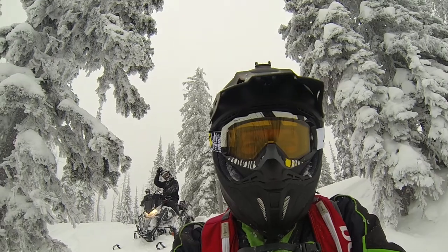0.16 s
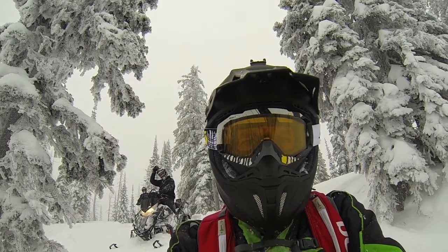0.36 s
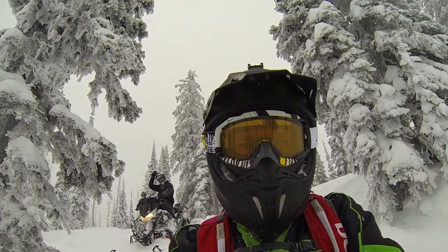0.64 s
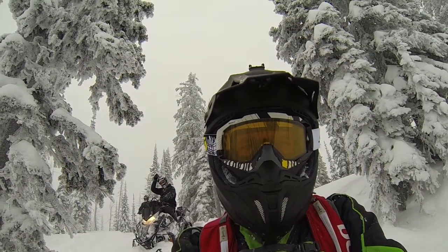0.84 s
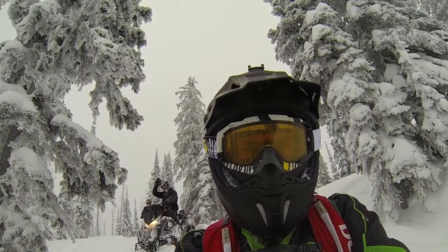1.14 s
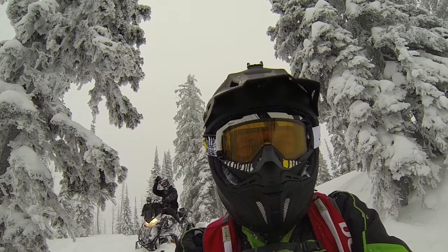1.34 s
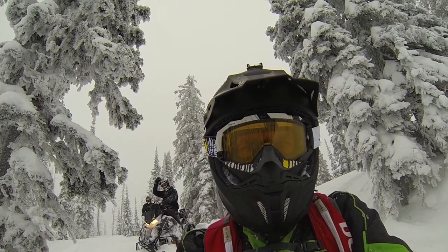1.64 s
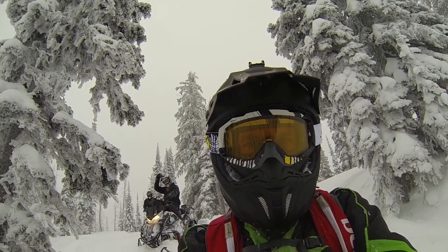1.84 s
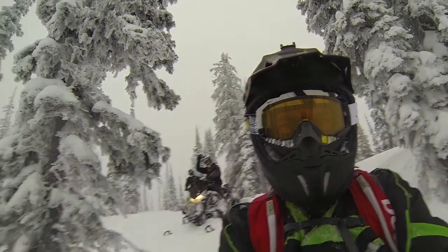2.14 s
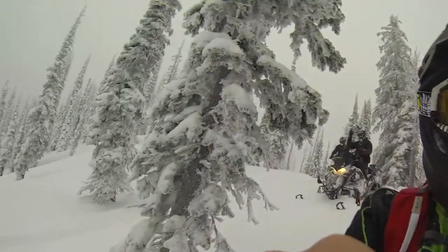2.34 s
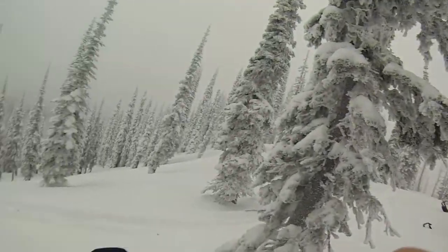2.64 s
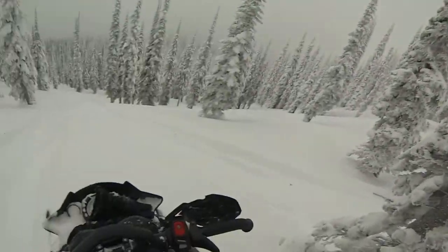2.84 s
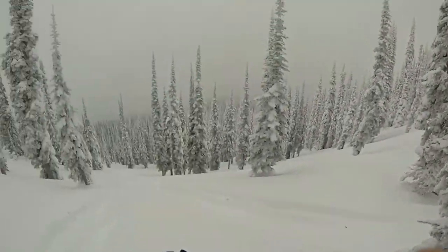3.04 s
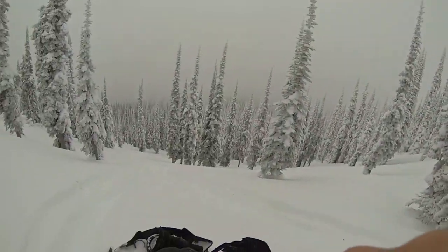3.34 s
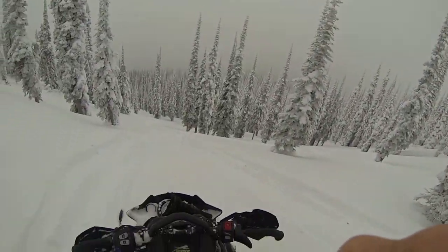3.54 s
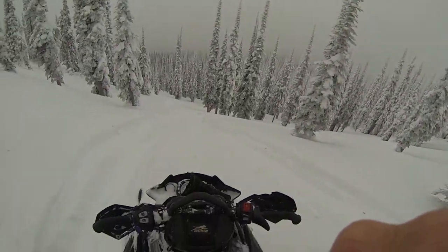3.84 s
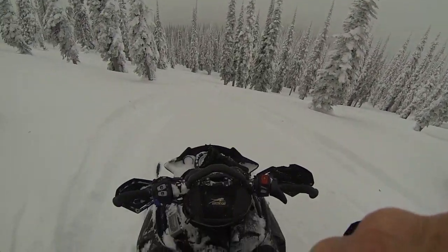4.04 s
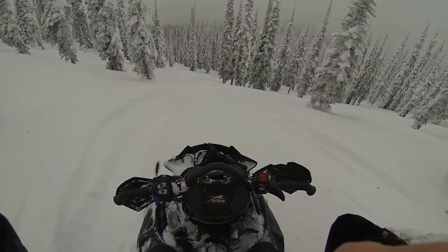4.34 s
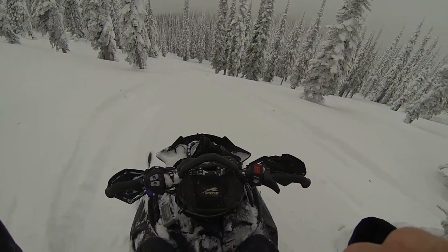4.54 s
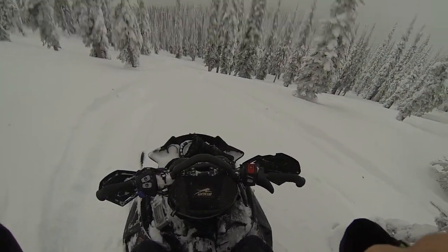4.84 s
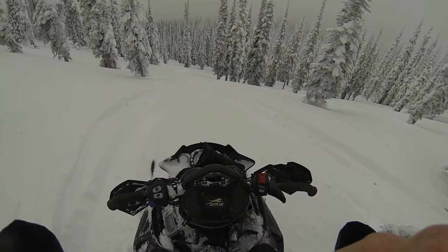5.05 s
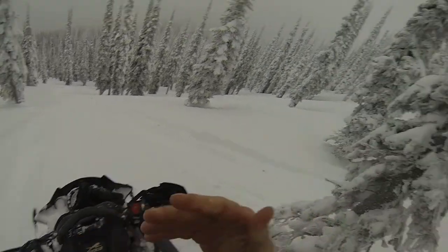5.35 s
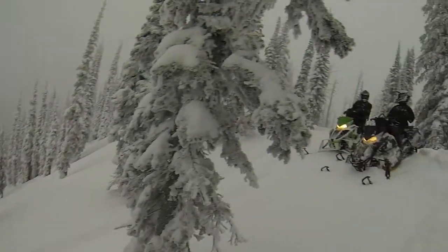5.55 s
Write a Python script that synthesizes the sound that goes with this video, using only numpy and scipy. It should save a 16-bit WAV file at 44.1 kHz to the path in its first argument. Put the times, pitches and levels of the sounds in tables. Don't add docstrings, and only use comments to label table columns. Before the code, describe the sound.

After a tiny silence, a two-stroke snowmobile idles outdoors on snow: about fifty low puffs a second, building and stumbling roughly every tenth of a second, with hollow clatter and hiss coloured by a sealed plastic camera housing. It starts quiet, with a faint sleeve rasp and small ticks before 0.5 s, swelling until 1 s and holding. From 2.05 s fingers rub the shell in gritty stick-slip strokes, with a hard knock at 2.3 and catches until 2.8. Engine mostly alone again until a bright knock and thump at 3.3 make it dive. More knocks follow at 3.6, 3.9 (loudest, clipping) and 4.16, with jolts and scrapes; a double clack lands at 4.87-4.95. The idle is softer from 3.7. From 5 s light sliding, ticks, dull taps and a low creaking twist, strongest near 5.5, continue to the end at 5.7. A very faint high electronic whistle sits underneath.

```python
import sys
import numpy as np
from scipy import signal
from scipy.fft import rfft, irfft
from scipy.io import wavfile
from scipy.ndimage import uniform_filter1d

SR = 44100
rng = np.random.default_rng(int(sys.argv[2]) if len(sys.argv) > 2 else 0)


def magnitude_from_level(level_db):
    exponent = np.asarray(level_db, float) / 20
    return 10 ** exponent


def store_wav(level_fs):
    pcm = np.round(np.clip(np.atleast_2d(level_fs), -1, 1) * 32767)
    wavfile.write(sys.argv[1], SR, pcm.T.astype(np.int16))


N = 250834
T = np.arange(N) / SR
FIRING_HZ = 52.4

STUMBLES_S = [-.05, .113, .247, .36, .437, .57, .78, .875, .97, 1.085, 1.16, 1.21, 1.296, 1.352, 1.467,
              1.582, 1.735, 1.83, 1.926, 2.0, 2.11, 2.33, 2.519, 2.728, 2.88, 2.97, 3.076, 3.147, 3.24]
# [f/Hz, width/Hz, level/dB]
MUFFLER_MODES = [(197.8, 18.3, -7), (145.4, 21, -7), (304, 59, -5.5)]
# [f/Hz, density level/dB]
CLATTER_SPECTRUM = [(250, -11.5), (420, -3), (585, -14), (993, -14), (1300, -6), (1490, -8), (2210, -17),
                    (3320, -26.5), (3690, -30.5), (4300, -28), (9000, -45), (11300, -38), (12200, -46.5),
                    (14200, -40.5), (15500, -42)]
# [f/Hz, width/Hz, level/dB]
CAVITY_MODES = [(1464, 310, -0.5), (3150, 570, -20.5), (3650, 1900, -29), (5560, 470, -40.5)]
# [t/s, level/dB]
SLOW_GAIN = [(0, -13.5), (.3, -11), (.6, -5), (1.0, 2), (2.0, 1), (3.3, 1), (3.7, -4.5), (4.5, -6),
             (5.72, -8)]
# [t/s, depth/dB, recovery/s]
GAIN_DUCKS = [
    (2.316, 0.5, 0.24),
    (3.336, 19.5, 0.36),
    (3.878, 26, 0.08),
    (4.19, 13, 0.16),
    (4.899, 17, 0.06),
    (4.952, 18.5, 0.18),
]
# [f/Hz, width/Hz, level/dB]
SHELL_MODES = [(2330, 685, 14), (2780, 960, 8.5), (3596, 320, -4.5)]
# [f/Hz, width/Hz, level/dB]
SHEEN_MODES = [(5420, 1700, 14), (7400, 1200, 4.5), (8140, 3900, 6), (11500, 1200, 1.5)]
# [f/Hz, width/Hz, level/dB]
HINGE_MODES = [(404, 99, 2.5), (615, 160, 1), (910, 310, -6)]
# [t/s, peak level/dB, ring f/Hz, top band level/dB]
KNOCKS = [(2.0854, -12.5, 1250, -32), (2.3131, 5.5, 1630, -32), (3.3314, -3.5, 1430, -15),
          (3.623, 6, 1575, -45), (3.632, -15, 1430, -38), (3.7639, -12.5, 1690, -29),
          (3.7735, -14, 1610, -24.5), (3.8104, -18.5, 1370, -51.5), (3.8656, -24, 1556, -29),
          (3.8753, 10.5, 1773, -36), (4.0203, -24, 1470, -11.5), (4.0698, -24, 1500, -12.5),
          (4.152, -10, 1500, -42), (4.16, 5, 1490, -52), (4.1801, -1.5, 1320, -27.5),
          (4.362, -4.5, 1430, -46.5), (4.8657, 2, 2040, -45), (4.8673, 8, 1560, -31.5),
          (4.8919, 2, 1310, -33), (4.947, 1, 1740, -22.5), (4.9498, 3.5, 1350, -39),
          (5.3238, -22.5, 1610, -14), (5.3631, -25, 1410, -10)]
# [t/s, peak level/dB, ring f/Hz, top band level/dB]
SKIN_CATCHES = [(2.07, -28, 1870, -11), (2.1628, -28, 1595, -26), (2.2115, -22.5, 1426, -18),
                (2.2672, -18.5, 1476, -11.5), (2.293, -13, 1480, -35), (2.3705, -19, 1556, -38),
                (2.4612, -12, 1520, -27), (2.586, -14, 1663, -17), (2.7074, -21, 1387, -32),
                (2.7643, -22, 1520, -1.5), (3.316, -17, 1510, -20), (4.4008, -27, 1730, -38.5)]
# [t/s, peak level/dB, top band level/dB]
NAIL_TICKS = [(0.0549, -36.5, -17), (0.355, -36.5, -17), (0.4294, -33, -28), (1.4434, -41, -13),
              (2.9017, -30.5, -20), (3.287, -36, -36.5), (3.341, -22, -29), (3.348, -27, -22.5),
              (3.364, -40, -31), (3.507, -50, -42), (3.9669, -42, -34), (4.0391, -31.5, -14),
              (4.135, -26.5, -19), (4.2152, -37.5, -9.5), (4.243, -44.5, -15), (4.3046, -33, -21),
              (4.229, -51, -25), (4.972, -43.5, -14), (4.599, -25.5, -19), (4.8113, -35, -9),
              (4.9066, -36, -1), (5.058, -39.5, -22), (5.0776, -38, -28), (5.215, -30, -34),
              (5.2989, -36, -14), (5.506, -35.5, -17)]
# [t/s, peak level/dB, ring f/Hz]
BODY_TAPS = [(.436, -34.5, 600), (3.333, -11, 690), (4.403, -21, 312), (4.812, -23.5, 360),
             (4.866, -17, 470), (4.893, -8.5, 506), (4.948, -9.5, 615), (5.06, -40.5, 880),
             (5.078, -39, 810), (5.219, -36, 637), (5.345, -26.5, 635), (5.362, -25.5, 720)]
# [t/s, peak level/dB, f/Hz, first swing sign]
JOLTS = [(2.299, -15, 58.7, -1), (2.314, -11, 45.3, 1), (2.594, -12, 24.4, -1), (3.314, -12, 72, 1),
         (3.332, 1.5, 143, 1), (3.774, -13.5, 134, 1), (4.152, -6.5, 85.6, -1), (4.196, -6, 75, 1),
         (4.318, -17, 34, 1), (4.335, -8, 78, -1), (4.403, -21.5, 215, 1), (4.888, -8.5, 143, -1),
         (4.89, -1, 136, 1), (4.892, -7, 53, 1), (4.901, -1, 96.5, -1)]
# [t/s, peak level/dB, f/Hz, first swing sign, t60/s]
MOUNT_SWINGS = [(2.762, -10, 63, 1, .083), (3.3313, -7, 77.8, 1, 0.1), (3.623, -7, 97.2, 1, 0.11),
                (3.81, -16.5, 92, 1, .047), (3.8683, -11.5, 101.8, -1, 0.02), (3.875, -8.5, 71, 1, 0.083),
                (3.8802, -4, 104.7, -1, 0.034), (4.16, -5.5, 75.5, 1, 0.18), (4.578, -18.5, 45.4, 1, .13),
                (4.624, -22, 78.5, 1, 0.24), (4.811, -13.5, 74, -1, 0.15), (4.908, -17.5, 98, 1, 0.13),
                (4.953, -7.5, 103.3, -1, .12), (5.321, -20.5, 101, -1, 0.23), (5.353, -15.5, 108, 1, 0.28)]
# [start t/s, firmest t/s, end t/s, peak level/dB, sheen level/dB]
PRESS_STROKES = [(0.403, 0.44, .45, -44, -57), (2.054, 2.078, 2.213, -29.5, -19),
                 (2.256, 2.313, 2.333, -18, -20.5), (2.494, 2.596, 2.66, -23, -22.5),
                 (2.64, 2.706, 2.846, -27.5, -29.5), (2.71, 2.758, 2.833, -26.5, -18.5),
                 (3.502, 3.607, 3.62, -43.5, -11.5), (3.759, 3.771, 3.785, -25, -31),
                 (3.868, 3.875, 3.892, -10, -34), (4.105, 4.148, 4.152, -38, -21),
                 (4.145, 4.16, 4.212, -20, -23.5), (4.306, 4.325, 4.382, -18.5, -22.5),
                 (4.39, 4.402, 4.43, -24, -28), (4.442, 4.501, 4.52, -44, -17.5),
                 (4.56, 4.594, 4.68, -44, -16.5)]
# [start t/s, end t/s, first level/dB, last level/dB, sheen level/dB]
EVEN_DRAGS = [(0.303, 0.397, -57, -52.5, -41), (2.158, 2.203, -35, -41.5, -21),
              (2.202, 2.273, -32, -36, -19.5), (2.358, 2.462, -35.5, -30, -49),
              (2.461, 2.491, -27, -23, -23.5), (2.485, 2.506, -30, -33, -17),
              (3.311, 3.338, -19.5, -23, -23.5), (3.456, 3.504, -43, -65, -24.5),
              (3.663, 3.714, -60, -49, -17), (3.799, 3.876, -46, -46.5, -30),
              (3.955, 4.01, -56, -53, -21.5), (4.015, 4.092, -54, -52.5, -19),
              (4.369, 4.398, -38, -39, -20), (4.704, 4.863, -52.5, -49.5, -20),
              (4.863, 4.9, -21.5, -21.5, -23.5), (5.054, 5.206, -66, -57, -15.5),
              (5.207, 5.297, -53.5, -56, -14.5), (5.317, 5.372, -49, -38, -22.5),
              (5.422, 5.737, -58, -63, -22)]
# [t/s, level/dB]
GRIP_EFFORT = [(0, -43.5), (1.75, -41.5), (2.05, -33.5), (2.61, -23), (3.3, -39.5), (4.17, -42.5),
               (4.42, -26.5), (4.55, -36), (5.01, -41), (5.58, -29.5), (5.75, -59)]
# [t/s, effort level/dB]
WRIST_TWIST = [
    (4.9, -24),
    (5.21, -7.5),
    (5.46, 1),
    (5.75, -5),
]
# [t/s, level/dB]
SLEEVE_RASP = [
    (0.05, -57.5),
    (0.166, -62),
    (0.22, -74),
    (0.446, -50),
    (0.455, -83),
]


def unit(x):
    return x / np.sqrt(np.mean(x ** 2))


def band(x, hz, width_hz):
    return signal.lfilter(*signal.iirpeak(hz, hz / width_hz, SR), x)


def between(x, lo_hz, hi_hz):
    return signal.sosfilt(signal.butter(3, [lo_hz, hi_hz], "bandpass", fs=SR, output="sos"), x)


def modes(x, table):
    return unit(sum(magnitude_from_level(db) * unit(band(band(x, hz, w), hz, w)) for hz, w, db in table))


def walk(rate_hz):
    hold = int(SR / rate_hz)
    steps = np.repeat(rng.standard_normal(N // hold + 1), hold)
    return unit(uniform_filter1d(steps, hold)[:N])


def curve(table):
    s, db = np.transpose(table)
    return magnitude_from_level(np.interp(T, s, db, left=-120, right=-120))


def add(out, s, sound):
    i = int(s * SR)
    out[i:i + len(sound)] += sound[:len(out) - i]


def puff(pulses, hz, width_s):
    t = T[:700] - .006
    edges = np.clip(np.minimum(T[:700], T[699::-1]) / .003, 0, 1) ** 2
    wavelet = edges * np.cos(2 * np.pi * hz * t) * np.exp(-(t / width_s) ** 2)
    return unit(signal.fftconvolve(pulses, wavelet)[:N])


def exhaust():
    first_firing_s, stumble_every_s, stumble_jitter_s = .0115, .105, .03
    jitter_s, scatter_db, build_db = .0007, 2.1, 11
    times = np.arange(first_firing_s, N / SR - .01, 1 / FIRING_HZ)
    chance = rng.standard_normal((len(times), 2))

    later = np.arange(STUMBLES_S[-1], N / SR + .3, stumble_every_s)[1:]
    stumbles = np.append(STUMBLES_S, later + stumble_jitter_s * rng.standard_normal(len(later)))
    charge = np.interp(times + .011, stumbles, np.arange(len(stumbles))) % 1
    strength_db = build_db * charge ** .7 + scatter_db * chance[:, 1]

    soft, sharp = np.zeros((2, N))
    at = ((times + jitter_s * chance[:, 0]) * SR).astype(int)
    soft[at] = magnitude_from_level(0.53 * strength_db)
    sharp[at] = magnitude_from_level(1.6 * strength_db)
    puffs = puff(soft, 198, .0044) + magnitude_from_level(-4.5) * puff(sharp, 270, .0022)
    puffs = puffs + magnitude_from_level(-4.5) * puff(sharp, 84, 0.011)
    ringing = sum(magnitude_from_level(db) * band(puffs, hz, w) * 100 / w for hz, w, db in MUFFLER_MODES)
    return unit(puffs + ringing)


def clatter():
    hiss_top_hz, broad_db, cavity_db = 15250, -51.5, -50.5
    hz = np.maximum(np.fft.rfftfreq(N, 1 / SR), 20)
    table = np.array(CLATTER_SPECTRUM)
    shape = magnitude_from_level(np.interp(np.log(hz), np.log(table[:, 0]), table[:, 1])) * (hz < hiss_top_hz)
    broad = irfft(rfft(rng.standard_normal(N)) * shape, N)
    air = rng.standard_normal(N)
    cavity = sum(magnitude_from_level(db) * unit(band(band(air, f, w), f, w)) for f, w, db in CAVITY_MODES)
    pulse_db = 0.4 * np.cos(2 * np.pi * (FIRING_HZ * T + 0.49)) + 1.26 * walk(24.985)
    return magnitude_from_level(pulse_db) * (magnitude_from_level(broad_db) * unit(broad) + magnitude_from_level(cavity_db) * cavity)


def rubbing():
    grain_db, patchy_db = 2.2, 2.4
    press_db, release_db = 22, 29.5
    dulling_db = 15.5
    shell_db_at_0, shell_per_sheen = 2.5, 0.53
    size_db = grain_db * rng.exponential(size=N) + patchy_db * walk(160)
    grains = rng.standard_normal((4, N)) * magnitude_from_level(size_db)
    body = unit(between(grains[3], 170, 1070))
    cavity = modes(grains[0], [(1520, 590, 0)]) + magnitude_from_level(-12.5) * body
    shell, sheen = modes(grains[1], SHELL_MODES), modes(grains[2], SHEEN_MODES)

    shapes = []
    for start, firmest, end, db, sheen_db in PRESS_STROKES:
        levels_db = (db - press_db, db, db - release_db)
        shapes.append(((start, firmest, end), levels_db, (sheen_db, sheen_db, sheen_db - dulling_db)))
    for start, end, first_db, last_db, sheen_db in EVEN_DRAGS:
        shapes.append(((start, end), (first_db, last_db), (sheen_db, sheen_db)))

    out = np.zeros(N)
    for s, db, sheen_db in shapes:
        span = slice(int(s[0] * SR), int(s[-1] * SR))
        t = T[span]
        edges = np.clip(np.minimum(t - s[0], s[-1] - t) / .003, 0, 1)
        touch = edges * magnitude_from_level(np.interp(t, s, db))
        sheen_db = np.interp(t, s, sheen_db)
        shell_db = shell_db_at_0 + shell_per_sheen * sheen_db
        out[span] += touch * (cavity[span] + magnitude_from_level(shell_db) * shell[span] + magnitude_from_level(sheen_db) * sheen[span])
    return out


def impacts():
    knock_t60_s, catch_t60_s, tick_t60_s, tap_t60_s = 0.0078, 0.045, 0.014, 0.013
    tick_hz, tick_spread, tap_top_db = 1517, 0.047, -39
    out, t = np.zeros(N), T[:2000]
    pitch_hz = tick_hz * (1 + tick_spread * rng.standard_normal(len(NAIL_TICKS)))
    rows = [(*row, knock_t60_s) for row in KNOCKS]
    rows += [(*row, catch_t60_s) for row in SKIN_CATCHES]
    rows += [(s, db, hz, top_db, tick_t60_s) for (s, db, top_db), hz in zip(NAIL_TICKS, pitch_hz)]
    rows += [(*row, tap_top_db, tap_t60_s) for row in BODY_TAPS]
    cracks = rng.standard_normal((len(rows), len(t)))
    for (s, db, hz, top_db, t60_s), crack in zip(rows, cracks):
        decay = np.exp(-np.log(1000) * t / max(t60_s, .004))
        ring = np.sin(2 * np.pi * hz * t) * decay * np.minimum(t / .0012, 1)
        snap = np.exp(-t / 0.00079) * np.minimum(t / 0.00034, 1)
        bright = magnitude_from_level(top_db / 2 + 4.5) * modes(crack, SHELL_MODES) + magnitude_from_level(top_db) * modes(crack, SHEEN_MODES)
        add(out, s, magnitude_from_level(db + 0.5) * (ring + snap * bright))
    return out


def thumps():
    jolt_cycles, softer_per_db = 1.54, 0.45
    out, t = np.zeros(N), T[:16000]
    jolts = [(*row, jolt_cycles / row[2]) for row in JOLTS]
    for s, db, hz, sign, t60_s in jolts + MOUNT_SWINGS:
        rise_s = 0.00015 * magnitude_from_level(-softer_per_db * db)
        decay = np.exp(-np.log(1000) * t / t60_s)
        swing = np.sin(2 * np.pi * hz * t) * decay * (1 - np.exp(-t / rise_s))
        add(out, s, np.sign(sign) * magnitude_from_level(db) * swing / swing.max())
    return out


def grip():
    held_s, held_db = 3.3, -47
    twist_mount_db, twist_creak_db, creak_power, creak_flicker_db = -30.5, -54, 1.5, 2.5
    sway = unit(between(rng.standard_normal(N), 6.5, 36.8))
    mount = unit(band(between(rng.standard_normal(N), 78, 190), 102, 20))
    creak = modes(rng.standard_normal(N) * magnitude_from_level(creak_flicker_db * walk(40)), HINGE_MODES)
    twist = curve(WRIST_TWIST)
    nudges = magnitude_from_level(held_db) * (T > held_s) + magnitude_from_level(twist_mount_db) * twist
    return curve(GRIP_EFFORT) * sway + nudges * mount + magnitude_from_level(twist_creak_db) * twist ** creak_power * creak


def rasp():
    fabric = rng.standard_normal(N) * magnitude_from_level(2.0 * walk(120))
    return curve(SLEEVE_RASP) * modes(fabric, [(2035, 350, 0)])


def whine():
    whine_hz, frame_hz, frame_phase = 11391, 59.94, .11
    gate = np.clip(3 * (np.cos(2 * np.pi * (frame_hz * T + frame_phase)) - .1), 0, 1)
    upper = magnitude_from_level(-76) * np.sin(2 * np.pi * whine_hz * T)
    lower = magnitude_from_level(-79.0) * np.sin(np.pi * whine_hz * T)
    return gate * (upper + lower)


def gain_control():
    escape_db, attack_s = -20, 0.0014
    dive_db = np.zeros(N)
    for at, depth_db, recovery_s in GAIN_DUCKS:
        since = np.maximum(T - at, 0)
        dive_db = dive_db - depth_db * np.minimum(since / attack_s, 1) * np.exp(-(since / recovery_s) ** 1.5)
    return curve(SLOW_GAIN) * (magnitude_from_level(dive_db) + magnitude_from_level(escape_db))


def scene():
    exhaust_db, muffled_s, muffled_db = -36.5, 3.1, -2.5
    exhaust_gain = magnitude_from_level(exhaust_db + muffled_db * (T > muffled_s))
    steady = gain_control() * (exhaust_gain * exhaust() + clatter() + whine())
    return (steady + rubbing() + impacts() + thumps() + grip() + rasp())[None]


def roll_off(x):
    return signal.sosfilt(signal.butter(12, 16290, fs=SR, output="sos"), x)


def record(dry):
    start_s, fade_s = .046, 0.0017
    x = np.clip(dry, -1, 1) * np.clip((T - start_s) / fade_s, 0, 1)
    x = signal.sosfilt(signal.butter(1, 12, "highpass", fs=SR, output="sos"), x)
    x = signal.sosfilt(signal.butter(10, 15600, fs=SR, output="sos"), x)
    return roll_off(np.clip(x, -1, 1))


dry = scene()
out = record(dry)
store_wav(out)
```